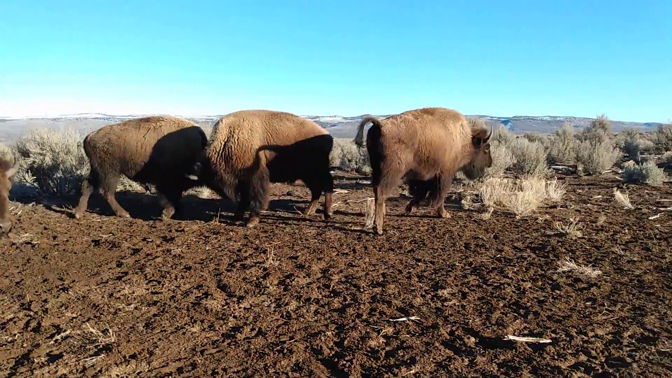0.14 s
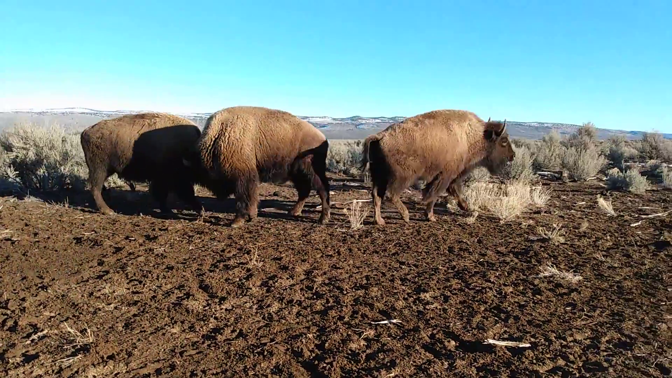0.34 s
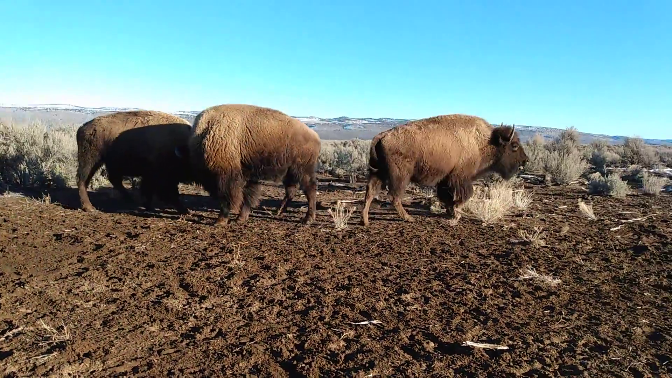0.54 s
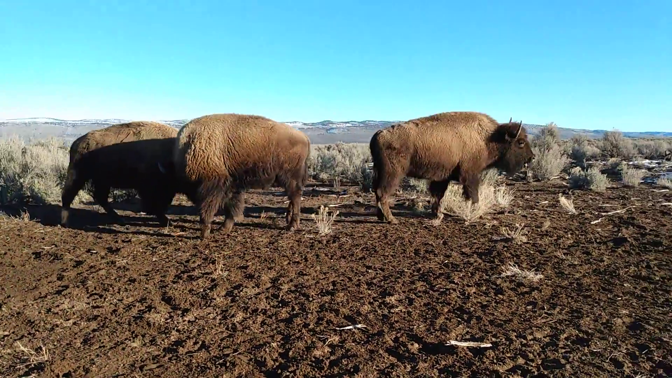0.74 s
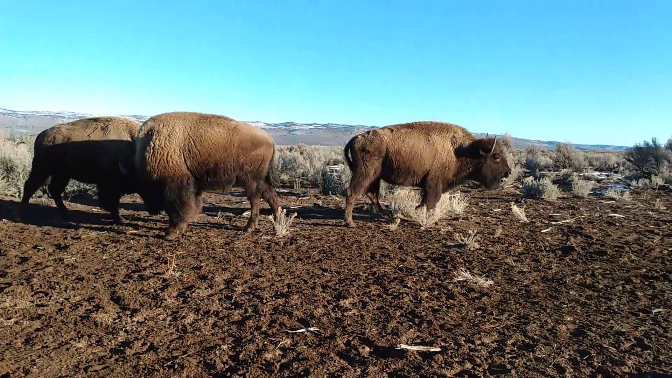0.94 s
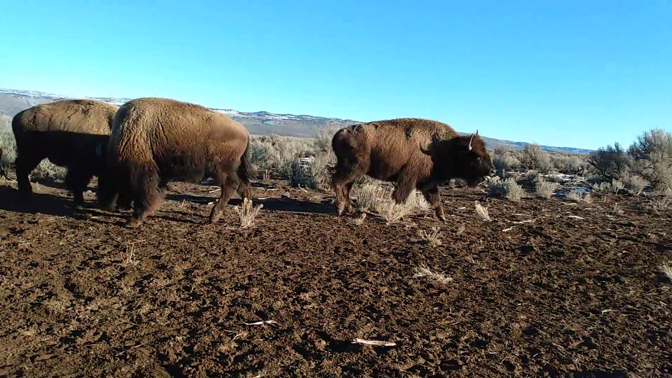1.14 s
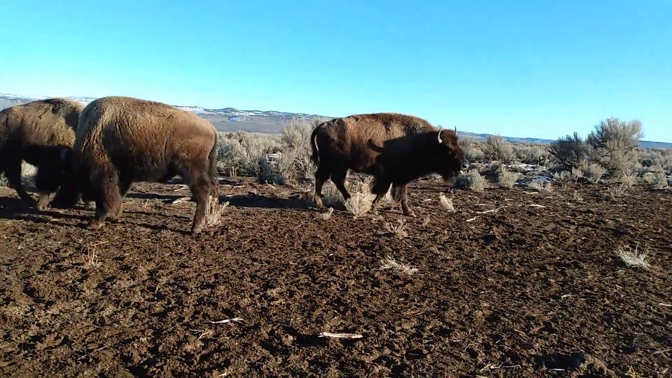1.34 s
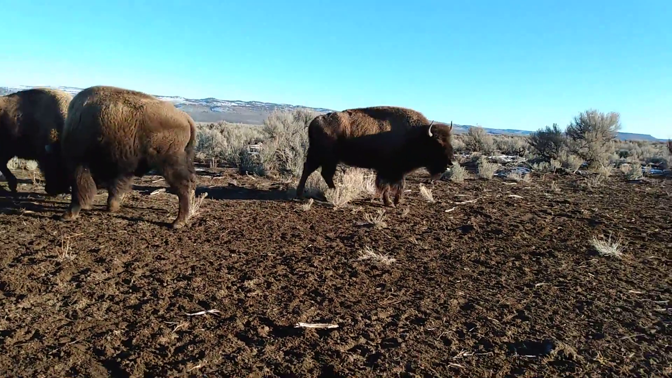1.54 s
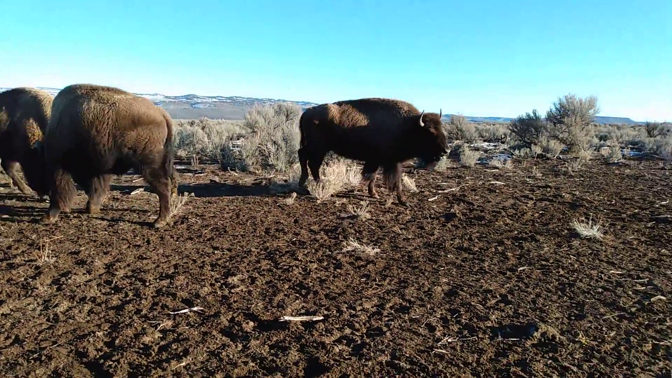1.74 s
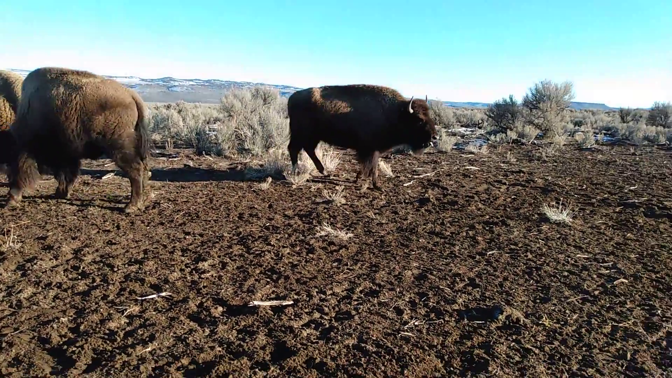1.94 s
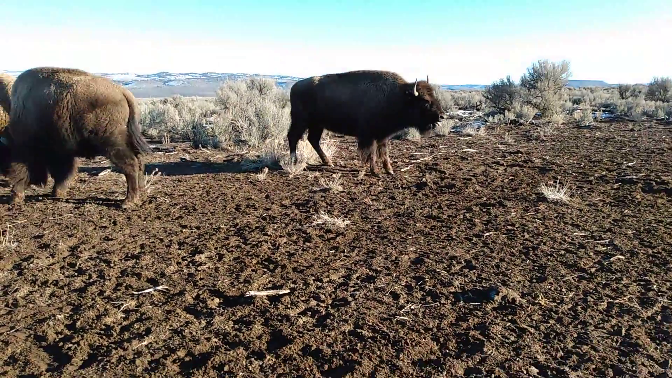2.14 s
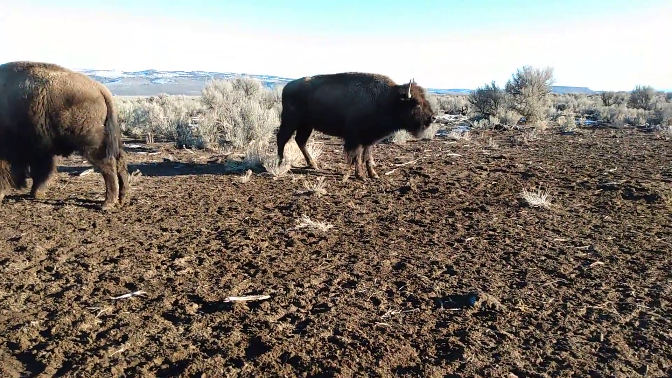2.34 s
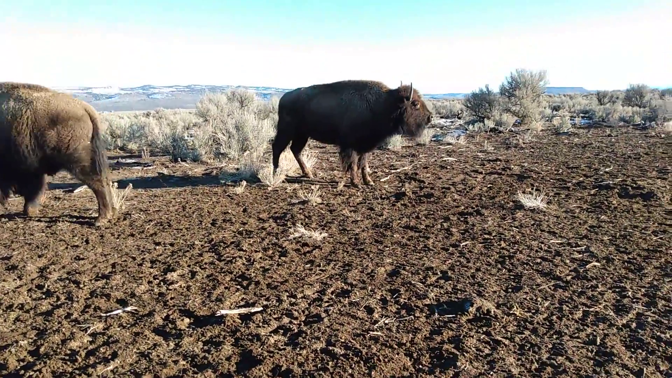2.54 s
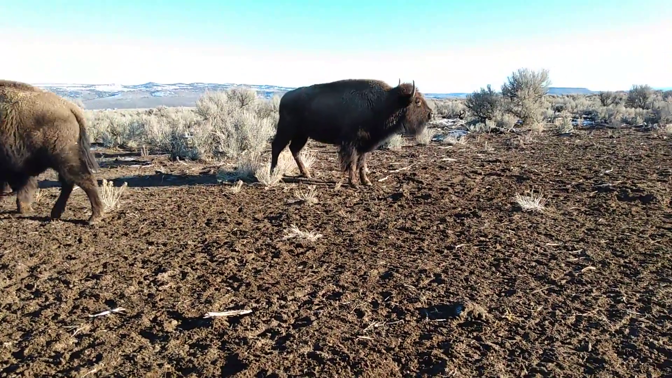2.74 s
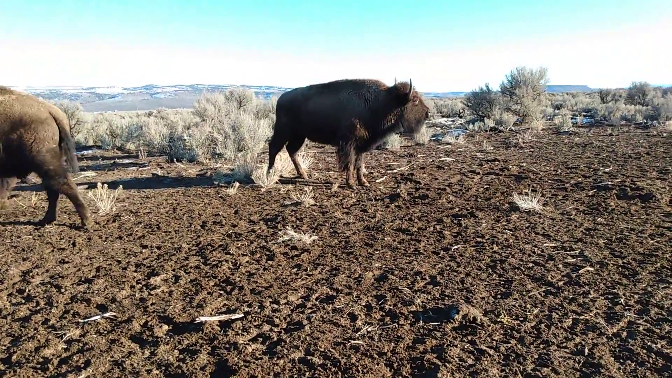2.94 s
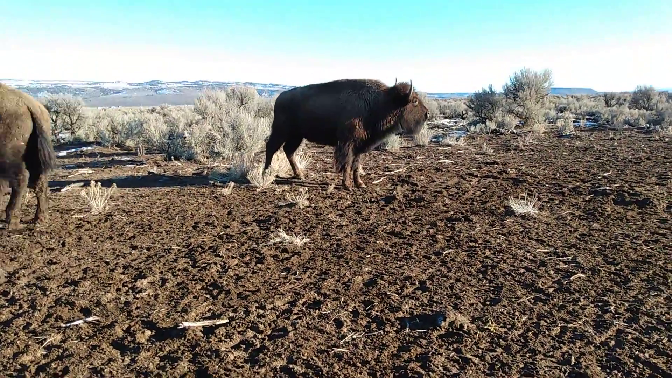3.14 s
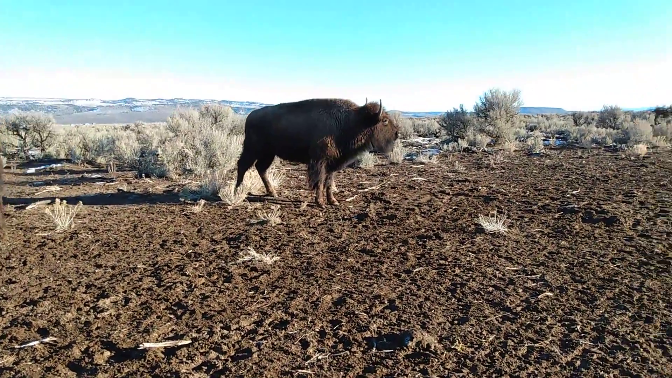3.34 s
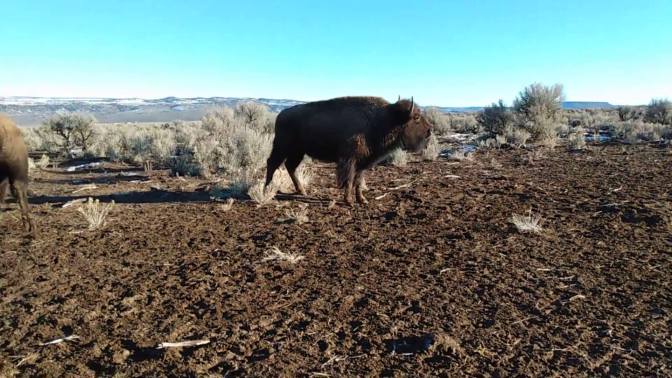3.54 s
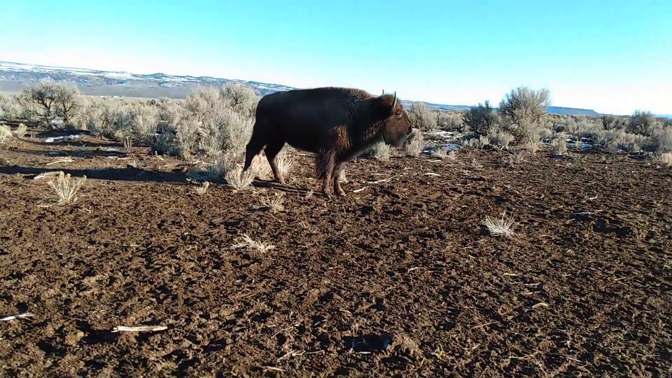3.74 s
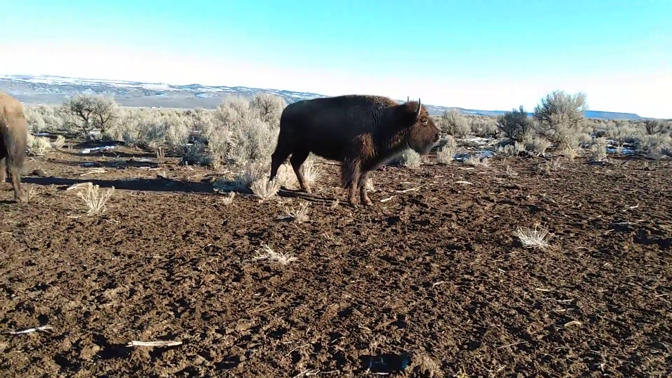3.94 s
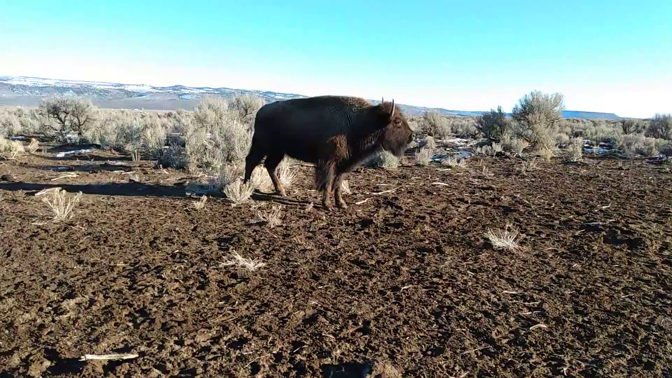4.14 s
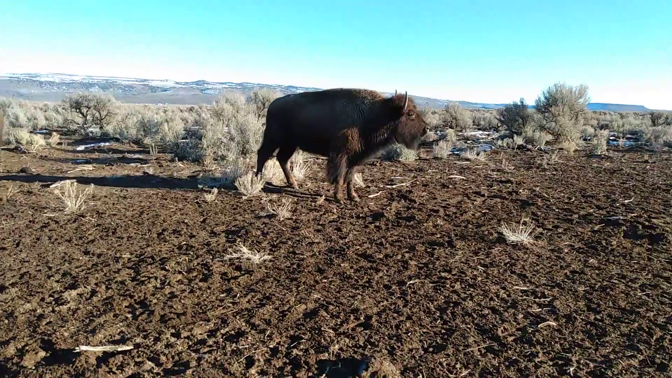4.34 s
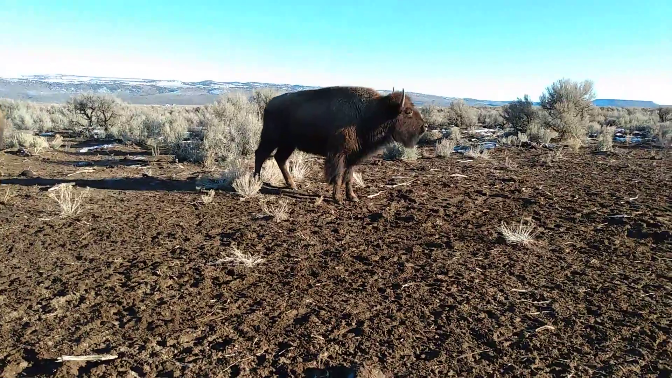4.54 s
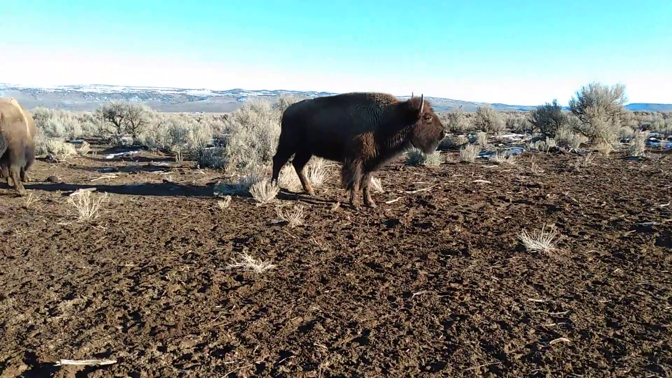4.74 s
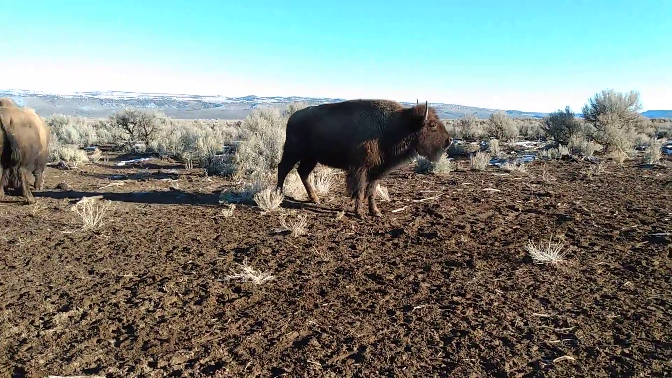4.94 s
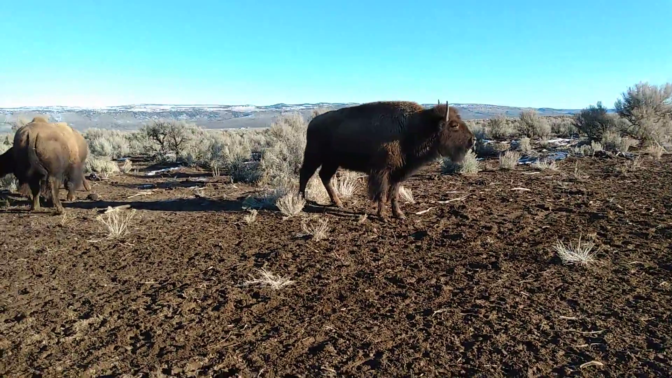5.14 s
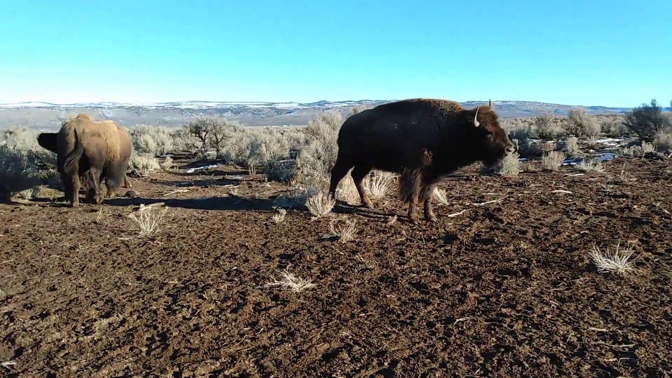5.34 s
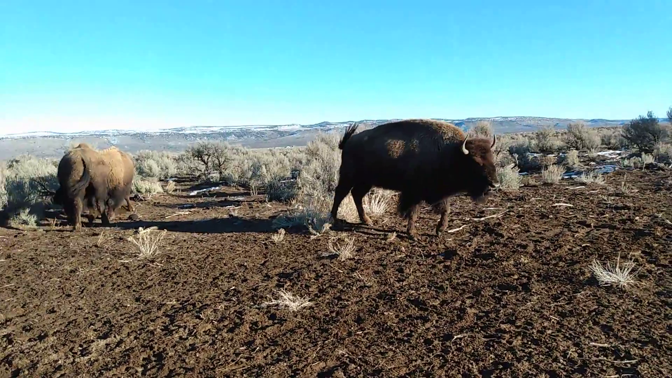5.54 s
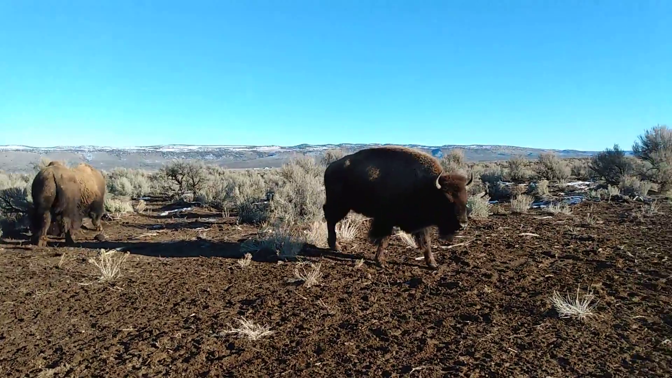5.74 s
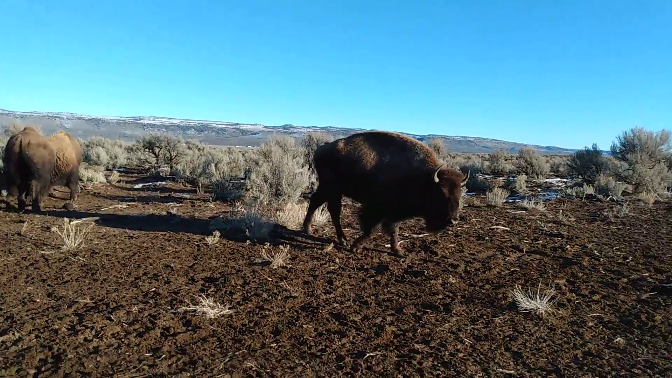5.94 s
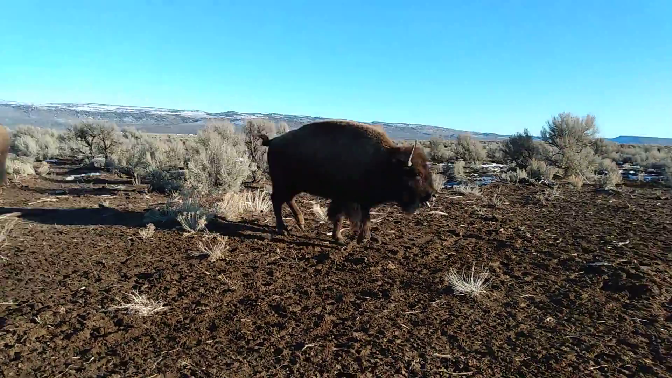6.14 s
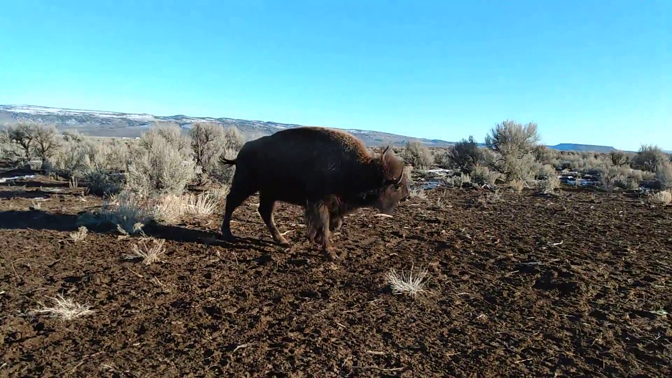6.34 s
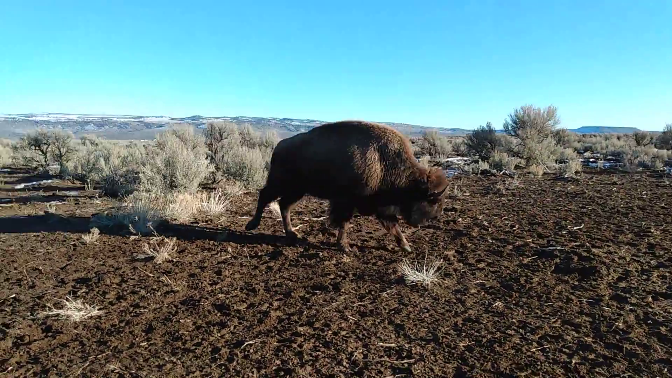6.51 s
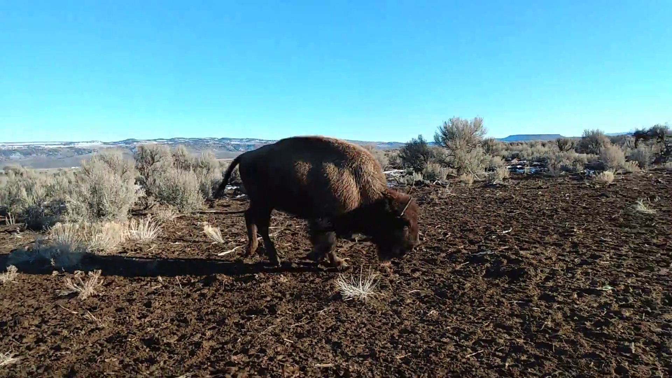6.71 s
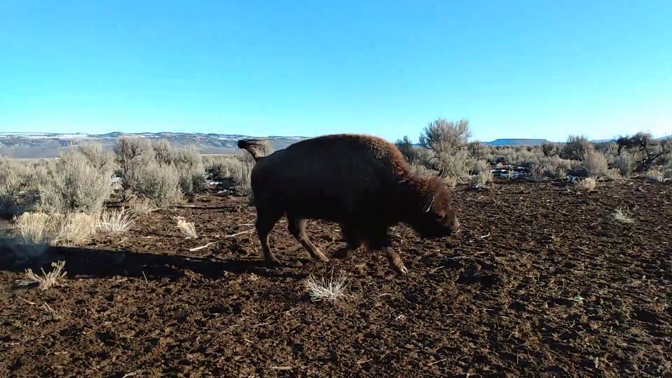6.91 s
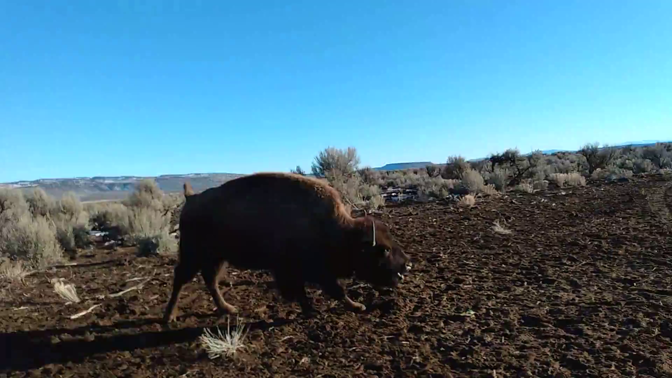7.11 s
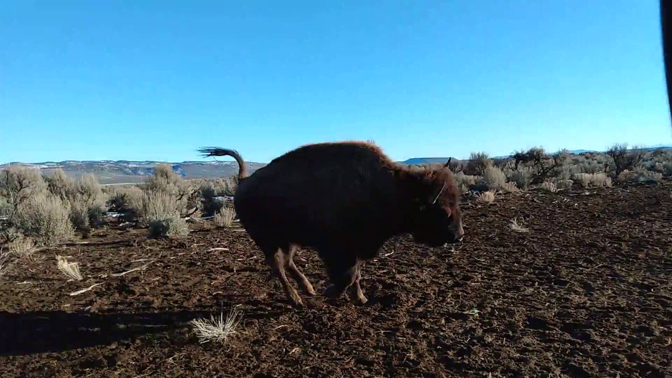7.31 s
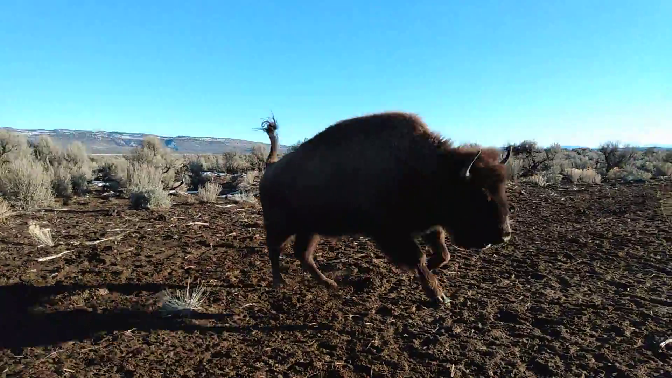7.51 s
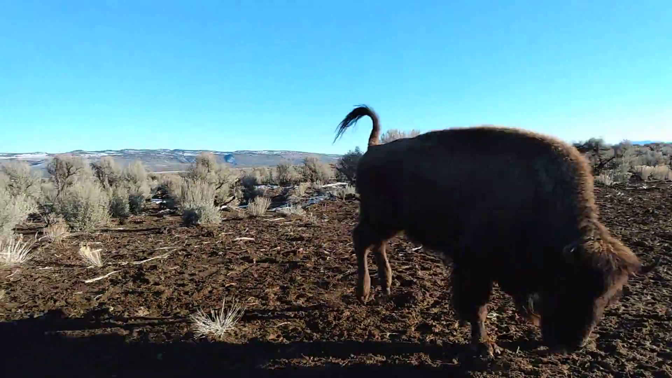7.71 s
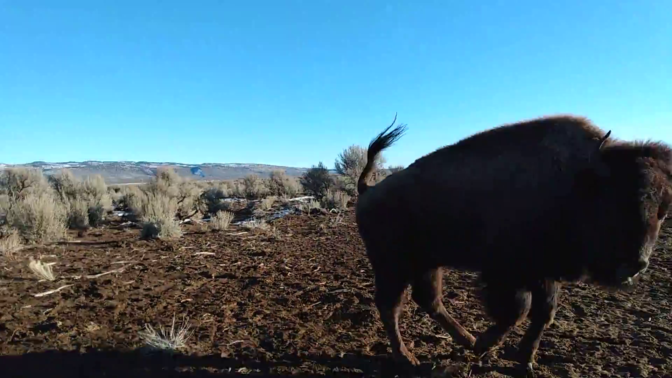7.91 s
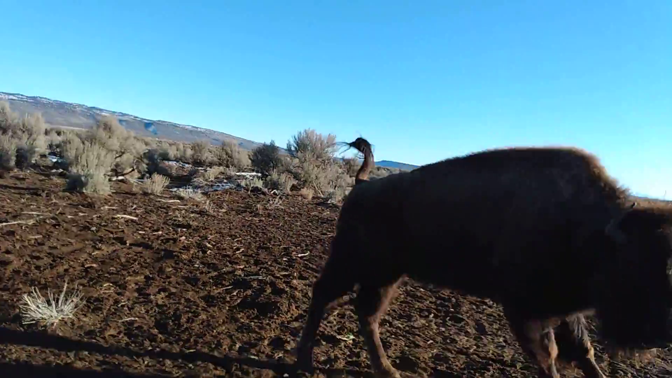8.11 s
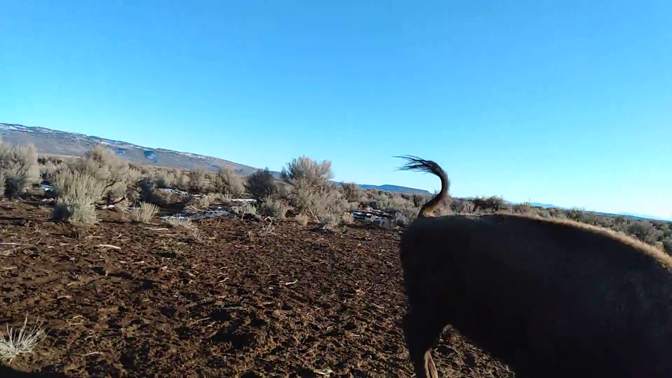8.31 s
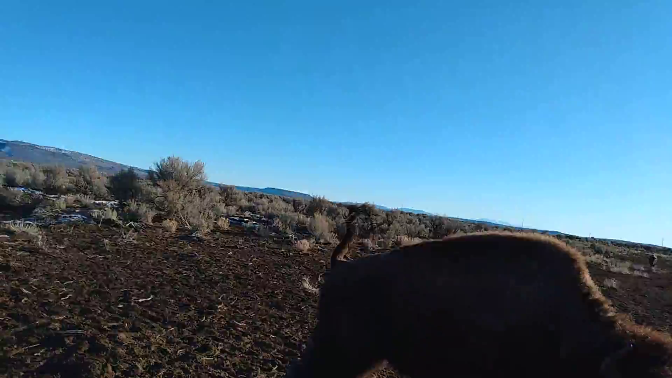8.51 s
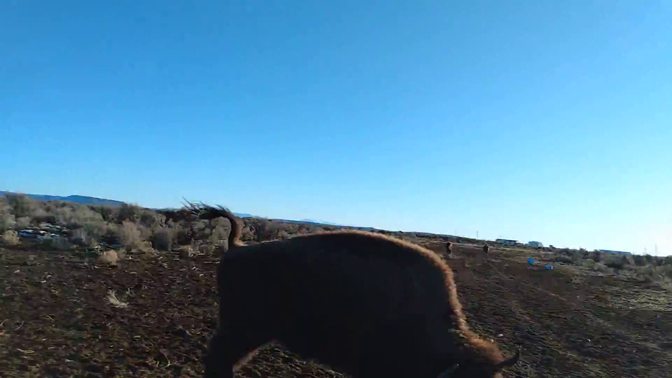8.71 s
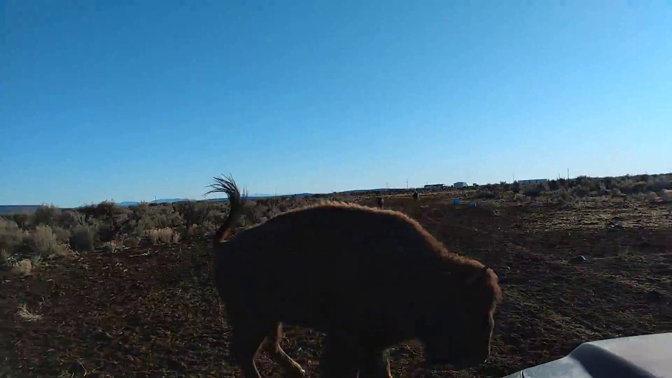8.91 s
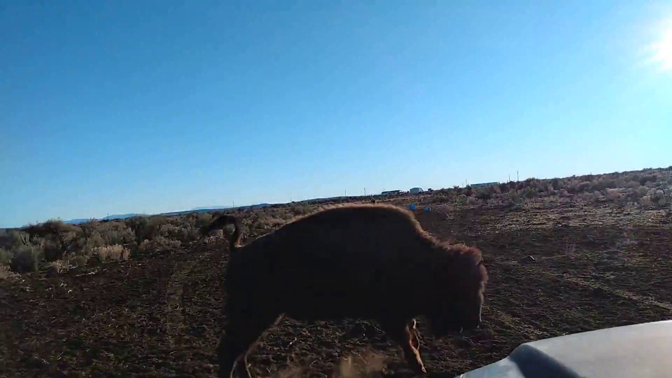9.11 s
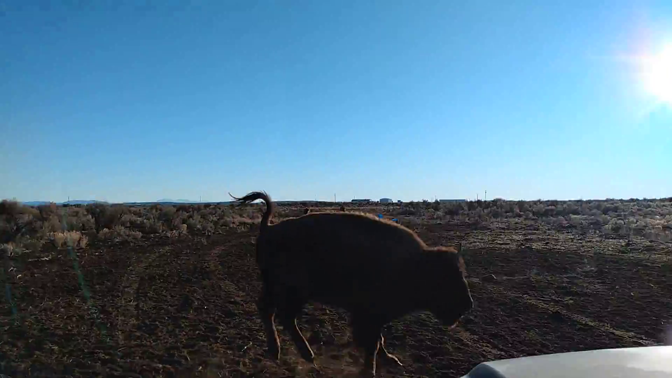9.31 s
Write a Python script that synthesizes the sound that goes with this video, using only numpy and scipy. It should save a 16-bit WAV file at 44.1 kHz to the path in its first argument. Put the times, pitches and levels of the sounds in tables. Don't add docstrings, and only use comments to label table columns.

```python
import sys
import numpy as np
from scipy import signal
from scipy.io import wavfile
from scipy.ndimage import uniform_filter1d

SR = 44100
rng = np.random.default_rng(int(sys.argv[2]) if len(sys.argv) > 2 else 0)


def master_out(mix):
    frames = np.transpose(np.atleast_2d(mix))
    ceiling = np.clip(frames, -1, 1)
    pcm = np.round(ceiling * 32767).astype(np.int16)
    wavfile.write(sys.argv[1], SR, pcm)


def linear_from_db(decibels):
    return 10 ** (np.asarray(decibels, float) / 20)


N = 417186

# start_s, firing_hz, hum_db, load_db (over idle)
ENGINE_RUN = [(0, 45.8, -40.5, -1.5), (.7, 47, -38.5, -2), (1.2, 49.53, -43, -1), (1.68, 52.5, -38.5, 0),
              (1.95, 58.17, -35, 2.5), (2.16, 65.9, -33.5, 4), (2.34, 70.16, -33.5, 5),
              (2.69, 59.77, -39, 4), (3.11, 49.22, -38, 1), (3.79, 50.27, -36, 0.5),
              (4.6, 49.9, -33.5, 0.5), (6.46, 50.2, -36.5, 0.5), (6.9, 55.77, -36.5, 3),
              (7.35, 62.8, -37.5, 5), (7.85, 58.08, -37, 4.5), (8.38, 51.82, -32, 1.5),
              (9.0, 56.5, -36.5, 3), (9.46, 50.66, -32.5, -2)]


def rms_one(x):
    return x / np.sqrt(np.mean(x ** 2) + 1e-20)


def in_time(rows):
    s, *columns = np.transpose(rows)
    return [np.interp(np.arange(N) / SR, s, c) for c in columns]


def at_hz(points, hz):
    table_hz, values = np.transpose(points)
    return np.interp(np.log(hz), np.log(table_hz), values)


def drift(rate):
    r = np.exp(-80 * np.pi * rate / SR)
    noise = rng.standard_normal(N // 40 + 2002)
    slow = signal.lfilter([1], [1, -2 * r, r * r], noise)[2000:]
    return np.interp(np.arange(N) / 40, np.arange(len(slow)), rms_one(slow - slow.mean()))


def band(x, low_hz, high_hz):
    edges = [low_hz, min(high_hz, .45 * SR)]
    return signal.sosfilt(signal.butter(2, edges, "band", fs=SR, output="sos"), x)


def resonate(x, hz, width):
    r = np.exp(-np.pi * width / SR)
    feedback = [1, -2 * r * np.cos(2 * np.pi * hz / SR), r * r]
    return signal.lfilter(np.array([1, 0, -1]) * (1 - r * r) / 2, feedback, x)


def place(pair, alike, pan_db, lead):
    n = np.arange(pair.shape[1])
    shared, different = np.sqrt(1 + alike) * pair[0], np.sqrt(1 - alike) * pair[1]
    left = shared + different
    right = np.interp(n - lead, n, shared - different)
    return np.array([left * linear_from_db(pan_db / 2), right * linear_from_db(-pan_db / 2)]) / np.sqrt(2)


def add(out, piece, s):
    i = round(s * SR)
    out[..., i:i + piece.shape[-1]] += piece[..., :N - i]


def puff(noise, rise_s, fall_s):
    t = np.arange(noise.shape[-1]) / SR
    return noise * (1 - np.exp(-t / rise_s)) * np.exp(-t / fall_s)


def snorts():
    # start_s, effort_db, nostril_opening_db_per_octave
    breaths = [
        [(.72, -68, -2), (.82, -58, 2), (1.1, -57.5, -4)],
        [(7.199, -56, 5), (7.207, -38, 12), (7.25, -36, 6), (7.285, -34, -9), (7.31, -41, -8),
         (7.34, -41.5, -31), (7.385, -43, -29), (7.41, -58, -8)],
        [(7.75, -44.5, -8), (7.82, -32, -7.5), (7.865, -36.5, 14), (7.885, -42.5, 4), (7.905, -43, -3),
         (7.94, -64, -8)],
        [(7.97, -58, 0), (7.985, -40, -1), (7.997, -30, 5), (8.024, -26, -3.5), (8.033, -33, -11),
         (8.042, -48, -5)],
        [(8.29, -56, -9), (8.4, -46, 1), (8.45, -44, 2), (8.483, -40, 6), (8.497, -42, 0), (8.53, -44, 0),
         (8.7, -64, 1)],
        [(8.79, -52, 7), (8.83, -42, -8), (8.87, -40, -2), (8.91, -41.5, 7), (8.95, -31, 7), (9.0, -31.5, -6),
         (9.04, -36, -23), (9.06, -49, -28), (9.46, -48.5, -19)],
    ]
    # pitch_hz, width_hz, level_db
    noses = [
        [(1580, 280, -6), (1110, 180, -8)],
        [(916, 280, 18.5), (1153, 82, 14), (1427, 43, 9), (2450, 400, -16), (3510, 340, -24)],
        [(520, 120, -2), (790, 120, 1.5), (1160, 220, 1.5), (1750, 210, 0.5), (2320, 150, -8.5),
         (4200, 400, -17), (5300, 500, -30)],
        [(473, 28, -3.5), (1040, 135, 5), (1620, 170, 1.5), (1870, 150, -5), (3430, 230, -16.5)],
        [(950, 118, 3), (1550, 310, -2.5), (594, 140, -11)],
        [(622, 79, -7.5), (1026, 194, 7), (1160, 120, -1.5), (1680, 200, -1), (2720, 270, -23.5),
         (3260, 200, -26.5)],
    ]
    # chest_db (over nose), hiss_db (over nose), hiss_db_per_opening,
    # hiss_share (of the effort's swing)
    layer_levels = [
        (-2, -12, 2, .53),
        (-3, -15, -.25, 0.6),
        (4, -14.5, 0.3, 0.67),
        (-8.5, -22.5, 0.5, 0.18),
        (7.5, -16, 1.5, 0.71),
        (-3, -24, 0.52, 0.39),
    ]
    # pan_db (left over right), left_lead_samples, likeness (0-1), chest_hz, nostril_hz
    places = [
        (-0.5, 6.7, 0.45, 190, 3500),
        (-2.5, 4.5, 0.98, 165, 2780),
        (-0.5, 7.5, 0.8, 61, 3200),
        (-2.5, 11.4, 0.8, 410, 3450),
        (1.5, 5.2, 0.73, 237, 2300),
        (-1.5, 3.6, 1, 202, 2900),
    ]
    chest_share = 0.47
    lumpy_db = 1.8
    out = np.zeros((2, N))
    for rows, nose, layers, spot in zip(breaths, noses, layer_levels, places):
        chest_over_db, hiss_over_db, hiss_per_opening, hiss_share = layers
        pan_db, lead, alike, chest_hz, nostril_hz = spot
        s, *columns = np.transpose(rows)
        t = np.arange(s[0], s[-1], 1 / SR)
        nose_db, bright_db = [np.interp(t, s, c) for c in columns]
        slack_db = nose_db.max() - nose_db
        chest_db = chest_over_db + (1 - chest_share) * slack_db
        hiss_db = hiss_over_db + (1 - hiss_share) * slack_db + hiss_per_opening * bright_db
        air = rng.standard_normal((2, len(t))) * linear_from_db(lumpy_db * drift(130)[:len(t)])
        weights = np.array([linear_from_db(level_db + bright_db * np.log2(hz / 1000)) for hz, width, level_db in nose])
        rings = [nose_ring(air, hz, width, slack_db) for hz, width, level_db in nose]
        ringing = sum(w * x for w, x in zip(weights, rings)) / np.sqrt(np.sum(weights ** 2, axis=0))
        chest = rms_one(resonate(band(air, 70, 420), chest_hz, chest_hz))
        hiss = resonate(resonate(band(air, 1400, 6400), nostril_hz, 1050), nostril_hz, 1050)
        sound = ringing + linear_from_db(chest_db) * chest + linear_from_db(hiss_db) * rms_one(hiss)
        fade = np.clip(np.minimum(t - s[0], s[-1] - t) / 0.0049, 0, 1)
        add(out, place(fade * linear_from_db(nose_db) * sound, alike, pan_db, lead), s[0])
    return out


def nose_ring(air, hz, width, slack_db):
    sag_octaves_per_db, even_s, even_share = .005, .012, .5
    x = resonate(resonate(air, hz, 2 * width), hz, width)
    at = np.cumsum(2 ** (-sag_octaves_per_db * slack_db * np.log2(hz / 400)))
    x = np.array([np.interp(at, np.arange(len(v)), v) for v in x])
    power = uniform_filter1d(np.mean(rms_one(x) ** 2, axis=0), size=round(even_s * SR))
    return rms_one(x / (power + .02) ** (even_share / 2))


def flutter():
    # pitch_hz, width_hz, level_db
    palate = [(2710, 300, -3), (3210, 430, 0.5), (3920, 310, 1), (4640, 430, -4), (6200, 550, -15)]
    out, t = np.zeros((2, N)), np.arange(3000) / SR
    for s, peak_db, throat_hz, mouth_hz, mouth_db, spit_db in flaps():
        air = rng.standard_normal((2, len(t)))
        push = .5 * puff(np.sin(2 * np.pi * 85 * t - .8), 0.0017, 0.0082)
        ring_s = 0.0039 * linear_from_db(0.7 * (peak_db + 20.0))
        tone = np.sin(2 * np.pi * throat_hz * t) + 0.14 * np.sin(2 * np.pi * 2.17 * throat_hz * t)
        throat = -puff(tone, 0.0034, ring_s)
        jet = puff(air, 0.0032, 0.0041 * linear_from_db(0.35 * (mouth_db + 21.5)))
        mouth = 1.4 * resonate(resonate(jet, mouth_hz, 360), mouth_hz, 210)
        mouth = mouth + 0.93 * resonate(jet, 868, 78) - 0.31 * resonate(jet, 1600, 260)
        mouth = band(mouth + 1.03 * resonate(jet, 480, 140), 260, 2100)
        spray = puff(air[::-1], 0.0065, 0.0058)
        tongue = 1 + 0.048 * rng.standard_normal()
        spit = 0.11 * band(spray, 6000, 16000)
        for hz, width, level_db in palate:
            spit = spit + linear_from_db(level_db) * resonate(resonate(spray, hz * tongue, width), hz * tongue, width)
        flap = linear_from_db(peak_db + 2.5) * (push + throat) * [[1], [.3]]
        add(out, place(linear_from_db(mouth_db) * mouth / abs(mouth).max(), 0.97, -2.2, 10.3), s - .002)
        add(out, place(linear_from_db(spit_db) * spit / abs(spit).max(), 0.38, -1.7, 7.4), s - .006)
        add(out, place(flap, 0.95, -2.2, 7.6), s)
    return out


def flaps():
    # start_s, effort_db, throat_hz, mouth_hz, mouth_db (over throat)
    grunt = [(8.34, -19.5, 183, 950, -16.5), (8.40, -16.5, 255, 1090, -10.5), (8.43, -16, 237, 1400, -7.5),
             (8.455, -12.5, 226, 1500, -3.5), (8.481, -16, 298, 1430, 0), (8.506, -9, 227, 1160, -7.5),
             (8.535, -11.5, 231, 910, -4), (8.563, -14, 230, 580, 1), (8.592, -16.5, 225, 620, 0),
             (8.622, -15, 211, 600, -4), (8.65, -24, 203, 620, -6), (8.69, -23, 190, 796, -12),
             (8.72, -24.5, 184, 786, -5)]
    # first_s, period_s, period_growth_s (per flap), level_db
    runs = [
        (8.341, .0285, 0, 0),
        (8.479, .0275, .0005, 0),
        (8.358, .113, 0, -3),
        (8.721, .04, 0, 0),
    ]
    counts = [5, 8, 2, 1]
    spit_follows, dries_s, dries_db_per_s = 0.72, 8.56, 42
    rows, (s, *columns) = [], np.transpose(grunt)
    for (first_s, period_s, slowing_s, run_db), count in zip(runs, counts):
        for k in range(count):
            at = first_s + period_s * k + slowing_s * k * (k - 1) / 2
            peak_db, throat_hz, mouth_hz, open_db = [np.interp(at, s, c) for c in columns]
            mouth_db = peak_db + open_db + 2 * run_db
            spit_db = -38 + spit_follows * (mouth_db + 19.5) - dries_db_per_s * max(at - dries_s, 0)
            rows.append((at, peak_db + run_db, throat_hz, mouth_hz, mouth_db, spit_db))
    return rows


def engine_hum():
    # order (multiple of a third of the firing rate), level_db (over the firing tone)
    weaker_orders = [(1, -32), (1.5, -42), (2, -9.5), (2.5, -12), (3.5, -12), (4, -19.5), (4.5, -18.5),
                     (5, -11.5), (7, -9), (10, -23.5), (12, -21)]
    # pitch_hz, level_db
    boom = [(92, -54), (100, -48.5), (112, -38), (122, -35), (134, -37.5), (150, -42), (190, -66)]
    fan_db, fan_best_hz, fan_loss_db_per_octave = -41.5, 135.8, 27
    cooling_fan_hz, cooling_fan_db = 181, -56
    firing_hz, firing_db, load_db = in_time(ENGINE_RUN)
    swing_db = firing_db - firing_db.mean()
    double_db = at_hz(boom, 2 * firing_hz) + swing_db / 2
    off_best_octaves = abs(np.log2(8 / 3 * firing_hz / fan_best_hz))
    fan_order_db = fan_db + swing_db - fan_loss_db_per_octave * off_best_octaves
    turn = 2 * np.pi * np.cumsum(firing_hz) / SR / 3 + .02 * drift(3)
    lines = [(3, firing_db), (6, double_db), (8, fan_order_db)]
    lines += [(k, firing_db + level_db) for k, level_db in weaker_orders]
    hum = sum(linear_from_db(level_db + drift(3)) * np.sin(k * turn + rng.uniform(0, 7)) for k, level_db in lines)
    whirr = resonate(resonate(rng.standard_normal(N), cooling_fan_hz, 14), cooling_fan_hz, 14)
    hum = hum + linear_from_db(cooling_fan_db) * rms_one(whirr)
    return place(np.array([hum, np.roll(hum, 200)]), .88, .2, 0)


def engine_roar(patchy_db):
    # pitch_hz, level_db (per Hz)
    roar = [(22, 0), (50, -10), (76, -9.5), (124, -5.5), (165, -14.5), (258, -15), (310, -16.5), (444, -26),
            (1100, -34), (1400, -39), (1900, -39.5), (6010, -60), (9000, -63.5), (15100, -57.5)]
    # pitch_hz, likeness (0-1)
    likeness = [(30, 1), (170, 1), (350, 0.88), (780, 0.92), (1400, 0.42), (2000, 0.16), (15000, 0.082)]
    # pitch_hz, pan_db (left over right)
    sides = [(60, 0), (180, 0.5), (550, 1), (1650, -3.5), (4970, -2.5), (15000, -1)]
    load_db = in_time(ENGINE_RUN)[-1]
    rumble_db, clatter_db = -3 + 0.97 * load_db, 4.5 + 0.88 * load_db
    out, edges = 0, 22 * 2 ** np.arange(0, 10, 1 / 3)
    white = rng.standard_normal((4, 2, N))
    for k, (low, high) in enumerate(zip(edges, edges[1:])):
        hz = np.sqrt(low * high)
        clatter_share = at_hz([(250, 0.18), (700, 1)], hz)
        answer_db = (1 - clatter_share) * rumble_db + clatter_share * clatter_db
        answer_db = answer_db * at_hz([(3000, 1), (8000, 0.26)], hz)
        level_db = at_hz(roar, hz) + answer_db + patchy_db * drift(13.7)
        pair = band(white[k % len(white)], low, high) * linear_from_db(level_db)
        lead = at_hz([(150, 12.5), (800, 10.4)], hz)
        out = out + place(pair, at_hz(likeness, hz), at_hz(sides, hz), lead)
    return linear_from_db(-36.5) * band(rms_one(out), 45.5, 19000)


def rustle(grains_per_s, spread_db):
    hooves_from_s = 6.1
    lower, upper = swells()
    sleeve = np.arange(N) < hooves_from_s * SR
    born = rng.random(N) < grains_per_s * linear_from_db(5.0 * drift(25)) / SR
    grain_sizes = born * linear_from_db(spread_db * np.minimum(rng.exponential(1, N), 3))
    sizes = uniform_filter1d(grain_sizes, size=40)
    grains = rng.standard_normal((2, N)) * (.8 + rms_one(sizes) * np.where(sleeve, .6, .3))
    low = rms_one(resonate(band(grains, 2300, 9700), 3500, 4200)) * lower
    high = rms_one(resonate(band(grains, 8800, 21000), 13000, 5000)) * upper
    sound = low + high
    cloth, soil = place(sound, .85, -3, -20), place(sound, .35, 0, -17)
    return np.where(sleeve, cloth, soil)


def swells():
    # peak_s, peak_db, swell_or_fade_s (for 20 dB), upper_part_db
    sleeve_moves = [(.755, -69, 0.08, .4), (1.05, -76, 1, -3), (1.87, -67, 0.3, -4.5), (2.1, -69, .5, -4),
                    (2.38, -72, .7, -3), (3.0, -68.5, 0.5, -3), (3.4, -71, 0, -4), (3.62, -63.5, 0.5, -1.5),
                    (3.8, -72, 0.3, -1.5), (3.93, -65.5, 0.3, -3), (4.2, -71, 0.4, -1.5),
                    (4.4, -74, .5, -1), (4.8, -73, 1, -3.5), (5.2, -77, 2, -3), (5.75, -77, 0.5, -1),
                    (6.08, -81.5, 3, -2)]
    # peak_s, peak_db, swell_s (for 20 dB), fade_s (for 20 dB), upper_part_db
    soil_moves = [(6.355, -60, 0.35, 0, -4), (6.655, -60, 0.1, 0.1, -2.5), (6.79, -54, 0, 0.24, -3.5),
                  (6.895, -59, 0.1, 0, -5), (7.29, -55, 0.23, .16, -3.5), (7.436, -53, 0.04, 0.07, -7),
                  (7.47, -54, .06, 0.1, -4), (7.51, -63, 0.6, 0.4, -1), (7.597, -45, 0, .02, -5),
                  (7.63, -54.5, 0.03, 0.13, -6), (7.705, -58, -0.1, 0.1, -6), (7.86, -57.5, 0.1, .15, -5),
                  (8.0, -55, 0.05, 0.03, -5), (8.18, -72, 5, 1.5, -.5), (8.25, -56.5, -0.24, 0.04, -11),
                  (8.49, -60, .19, .46, -3), (8.84, -61, -0.1, 0.4, -3.5), (8.97, -56, .12, 0.1, -5),
                  (9.3, -70, 2.5, 6, -5)]
    moves = [(s, db, d, d, up) for s, db, d, up in sleeve_moves] + list(soil_moves)
    t, power = np.arange(0, N, 32) / SR, 1e-10
    for s, peak_db, rise_s, fall_s, upper_db in moves:
        upper = min(linear_from_db(upper_db), .97) ** 2
        away = np.where(t < s, (s - t) / max(rise_s, .01), (t - s) / max(fall_s, .01))
        level = linear_from_db(peak_db - 20 * away ** 1.4)
        power = power + level ** 2 * np.array([[1 - upper], [upper]])
    return [np.interp(np.arange(N) / SR, t, np.sqrt(p)) for p in power]


def crackles():
    # start_s, peak_db, lower_part_db
    weave = [(3.3633, -58, -8), (3.3952, -51, -8), (3.4331, -56, -8), (3.4604, -57, -8), (3.4805, -56, -8),
             (3.5099, -58, -8), (3.5354, -55, -8), (3.5444, -54, -8), (3.5594, -54, -8), (3.6037, -55, -8),
             (3.6037, -49, -8), (3.6287, -53, -8), (3.6516, -55, -8), (3.6684, -50, -8), (3.6875, -49, -11),
             (3.7125, -54, -8), (3.7644, -57, -8), (3.7973, -55, -8), (3.8114, -58, -8), (3.8676, -47, -5),
             (3.8995, -49, -8), (3.935, -50, -8), (4.0128, -57, -8), (4.0507, -58, -8), (4.114, -58, -8),
             (4.146, -57, -8), (4.1734, -52, -4), (4.2058, -60, -8), (4.2133, -52, -8), (4.2333, -57, -8),
             (4.2517, -60, -8), (4.2737, -59, -8), (4.338, -55, -8), (4.3545, -50, -8), (4.4403, -58, -8),
             (4.468, -44, -8), (4.5531, -56, -8), (4.7117, -49, -3), (4.7381, -56, -8), (4.7716, -56, -8),
             (4.817, -57, -8)]
    out = np.zeros((2, N))
    for s, peak_db, low_db in weave:
        jet = puff(rng.standard_normal((2, 600)), 0.00047, 0.0015)
        snap = rms_one(resonate(jet, 13200, 3500)) + linear_from_db(low_db) * rms_one(resonate(jet, 6800, 2500))
        add(out, place(linear_from_db(peak_db + 3.5) * snap / abs(snap).max(), .8, -8, -18.0), s)
    return out


def ticks_and_snaps():
    # start_s, peak_db, pitch_hz,
    # pan_db (left over right)
    trim = [(1.7185, -49, 4650, -1.5), (2.1326, -48, 4300, -1.0), (2.6788, -49, 4850, -1.0),
            (3.017, -50, 4580, -3.5), (3.049, -52, 4750, -1.5), (3.9504, -46, 5860, -3.0),
            (5.0484, -53, 6000, -1.5), (5.0828, -45, 6060, -5), (6.5535, -54, 4610, 0.0),
            (7.6974, -48, 4380, -1.0), (7.9069, -50, 5050, -1.0), (2.6788, -47, 3900, -1),
            (2.6788, -49, 6500, -1), (3.951, -46, 4000, -3), (8.684, -48, 3950, -2), (8.718, -48, 4100, -2)]
    # start_s, peak_db, pitch_hz, pan_db (left over right)
    twigs = [(.735, -54, 14800, -3), (.752, -51, 15000, -3), (.77, -52, 14500, -3), (5.7, -54, 13500, -3),
             (5.79, -55, 12500, -3), (2.2278, -48, 11600, -2.5), (6.6438, -52, 10000, 0),
             (6.6555, -40, 6000, 9), (6.6555, -43, 12500, 4), (6.7885, -49, 6540, -4),
             (6.805, -44, 6000, -3), (6.82, -42, 14000, -2), (6.858, -50, 14000, -2),
             (6.8907, -44, 13000, -2), (7.4315, -37, 7400, -2.0), (7.433, -38, 5300, -2),
             (7.4764, -36.5, 5250, -3), (7.5552, -41, 11000, 2), (7.577, -52, 7500, 3),
             (7.5825, -34, 9000, 4), (7.5825, -37, 13500, 4), (7.5885, -33, 11500, 4),
             (7.4535, -44, 7400, -2), (7.621, -47, 9000, 2), (7.636, -49, 11000, 2),
             (7.6965, -47, 11000, 0), (7.5885, -27.5, 5800, 8), (7.599, -39, 6500, 3),
             (7.609, -42, 7200, 2), (7.685, -47, 4400, 0), (7.7593, -47, 5090, -0.5),
             (7.8625, -42, 4000, -5), (7.863, -40, 2400, 0), (7.863, -44, 5300, -2),
             (8.1778, -45, 9600, -6), (8.2437, -51, 4743, -12), (8.8763, -36, 12700, 0)]
    out = np.zeros((2, N))
    for s, peak_db, hz, pan_db, wide in [(*row, .08) for row in trim] + [(*row, .3) for row in twigs]:
        jet = puff(rng.standard_normal((2, 1500)), 0.00045, 0.002)
        tick = resonate(resonate(jet, hz, .5 * hz), hz, .5 * hz) + wide * band(jet, 4000, 16000)
        add(out, place(linear_from_db(peak_db) * tick / abs(tick).max(), .6, pan_db, -20), s)
    return out


def knocks():
    # start_s, peak_db, pitch_hz, length_cycles
    thuds = [(2.16, -33.5, 650, 6), (3.951, -26.5, 437, 3.8), (4.638, -30.5, 284, 6.2),
             (5.041, -39, 315, 5.2), (6.485, -28, 178, 3.7), (6.773, -37, 548, 13),
             (6.773, -32.5, 1770, 2.5), (7.585, -44, 2700, 5), (7.906, -29, 780, 7.3),
             (7.841, -24, 62, 2.9), (8.845, -27.5, 219, 5.2), (8.86, -32, 103, 8.2), (8.902, -26, 263, 6.2),
             (8.472, -21, 316, 2.7), (8.449, -27, 320, 1.5), (7.6, -29, 320, 1.2), (7.9, -29, 110, 1.2),
             (5.12, -37, 205, 14)]
    out, t = np.zeros((2, N)), np.arange(6000) / SR
    for s, peak_db, hz, cycles in thuds:
        arch = np.sin(np.pi * np.clip(t * hz / cycles, 0, 1)) ** 0.58
        add(out, linear_from_db(peak_db - 1.5) * np.sin(2 * np.pi * hz * t) * arch, s)
    return out


def key_clinks():
    # start_s, peak_db, low_tones_extra_db
    touches = [
        (.235, -47.5, -3),
        (.2765, -65, 16),
        (1.303, -60, 6),
        (1.34, -70, 5),
        (2.332, -61, -4),
        (2.36, -61, 0),
    ]
    # pitch_hz, level_db, t60_s (to fade 60 dB)
    tones = [(4240, -14.5, 0.087), (5230, -14, .06), (7150, -7, .07), (7260, -5, 0.08),
             (10000, -15.5, 0.09), (11200, -17, .055), (12900, -18, .05)]
    out, t = np.zeros((2, N)), np.arange(6000) / SR
    for s, peak_db, low_db in touches:
        strengths = rng.normal(0, 0.75, len(tones)) + low_db * (np.arange(len(tones)) < 2)
        clink = 0
        for (hz, level_db, t60), more_db in zip(tones, strengths):
            clink = clink + linear_from_db(level_db + more_db - 60 * t / t60) * np.sin(2 * np.pi * hz * t)
        add(out, linear_from_db(peak_db) * clink * linear_from_db([[-4], [3]]), s)
    return out


def scene():
    bison = snorts() + flutter()
    truck = engine_hum() + engine_roar(patchy_db=0.97)
    rubbing = rustle(grains_per_s=600, spread_db=8.0) + crackles()
    return bison + truck + rubbing + ticks_and_snaps() + knocks() + key_clinks()


def band_limit(x):
    return signal.sosfilt(signal.butter(12, 16540, fs=SR, output="sos"), x)


def record(dry):
    mix = signal.sosfilt(signal.ellip(10, .3, 45, 15800, fs=SR, output="sos"), dry)
    return band_limit(mix)


dry = scene()
out = record(dry)
master_out(out)
```